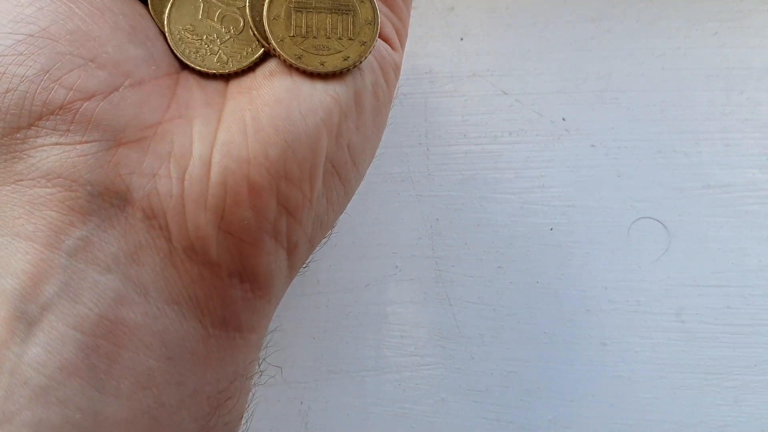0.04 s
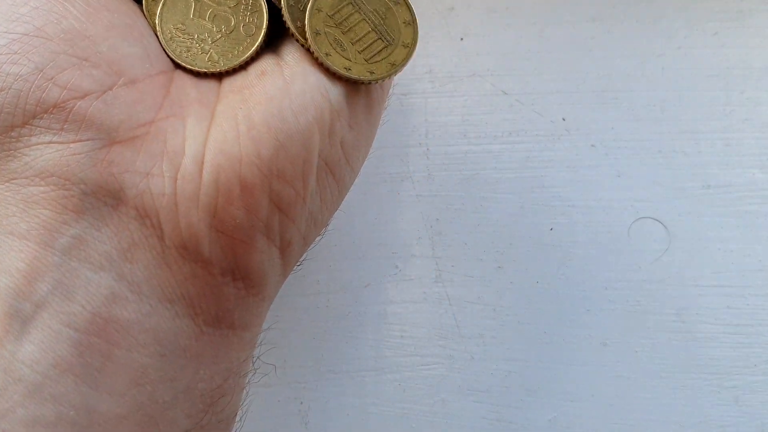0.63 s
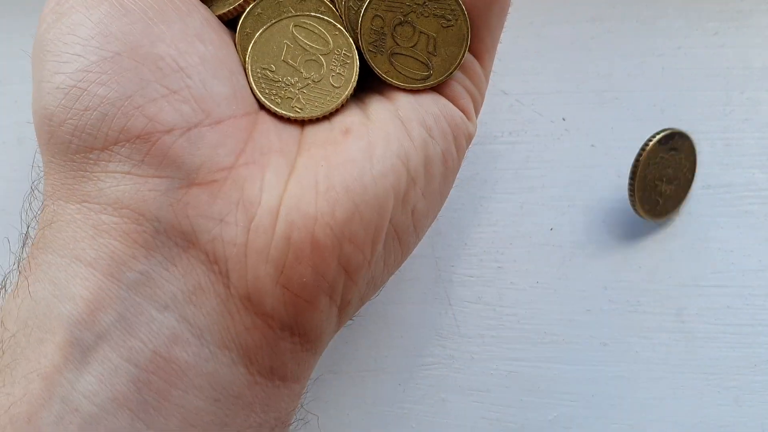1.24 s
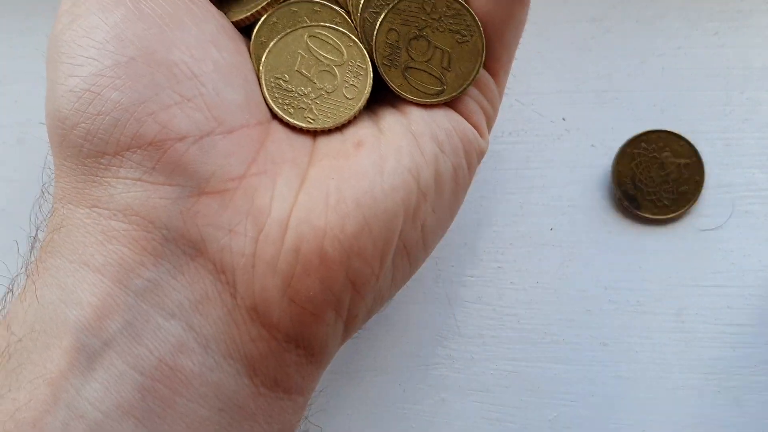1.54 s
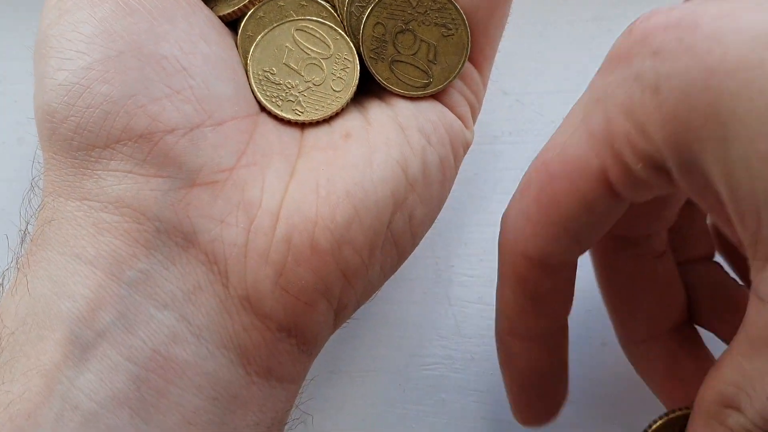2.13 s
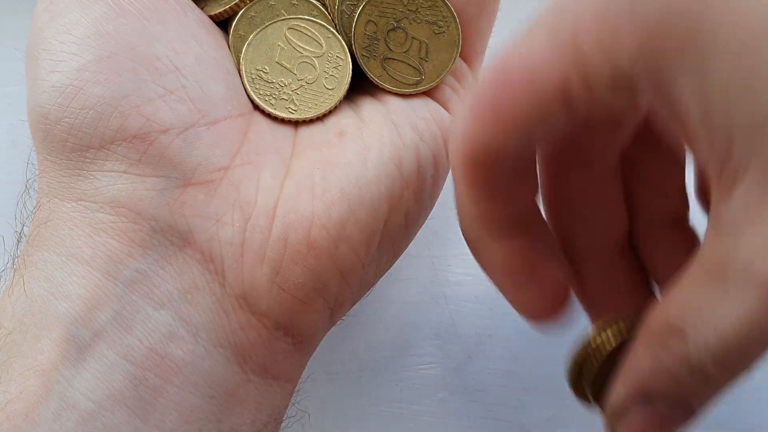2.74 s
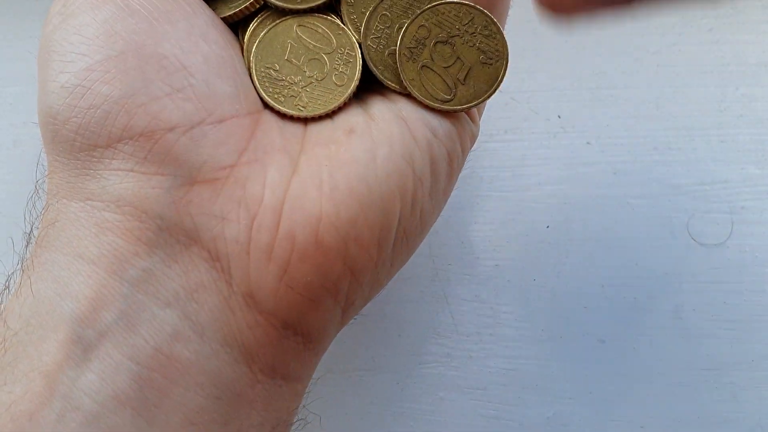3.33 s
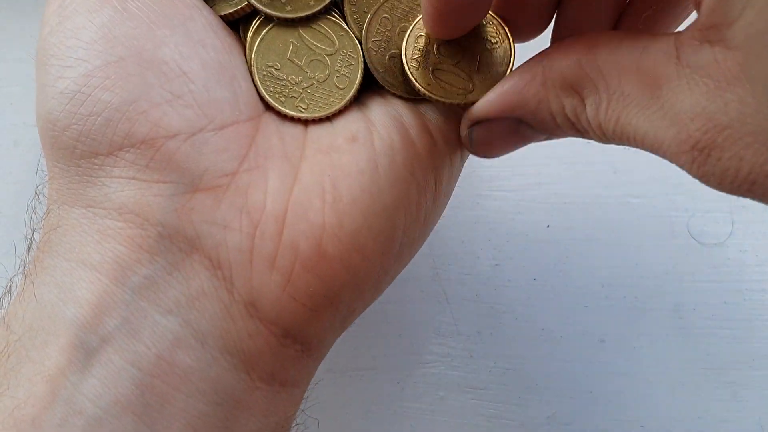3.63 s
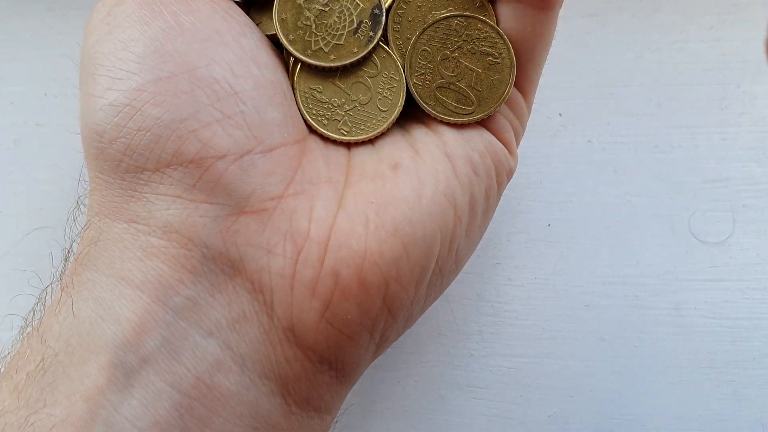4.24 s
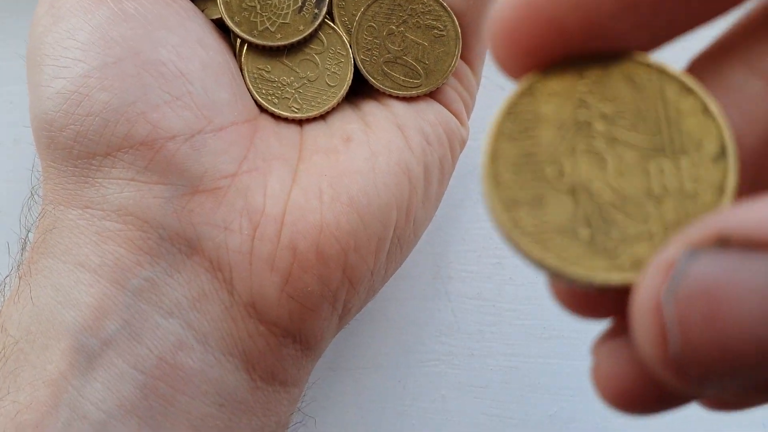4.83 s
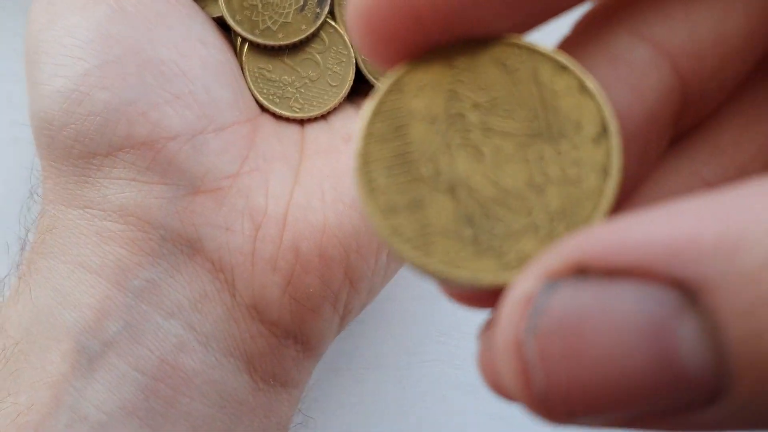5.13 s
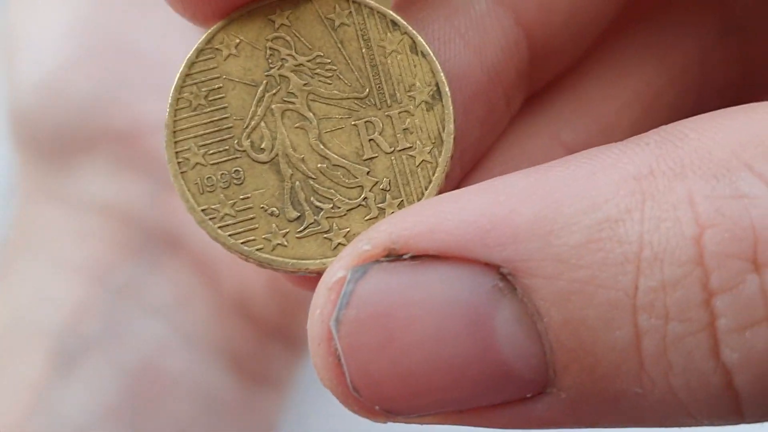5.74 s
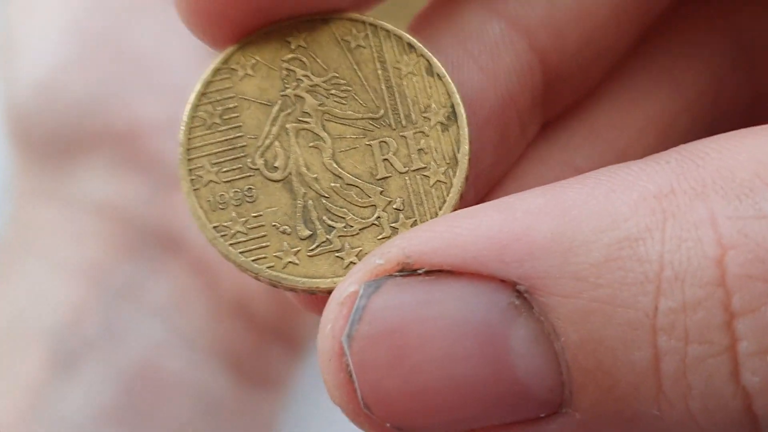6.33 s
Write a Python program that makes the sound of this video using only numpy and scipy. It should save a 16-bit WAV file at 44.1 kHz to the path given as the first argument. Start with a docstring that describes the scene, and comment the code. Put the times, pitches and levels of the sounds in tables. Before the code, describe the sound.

Coins shift in a palm, two fall and bounce on wood, one wobbles until stopped, then the pile clinks again.

```python
"""A small quiet room, the microphone close to a palm in which a handful of coins slides and clinks.
At about 0.9 s two coins slip off and bounce on a painted wooden board: the wood knocks, the metal sings.
They roll over the grain in a quickening wobble until fingers stop them (2.3 s) and slide them off.
The pile clinks again as a coin is picked out (3.2 s). Faint scuffs and a few light bumps
further off follow, over the hum of the room and the hiss of the microphone."""
import sys
import numpy as np
from scipy import signal
from scipy.fft import rfft, irfft
from scipy.io import wavfile
from scipy.ndimage import uniform_filter1d, minimum_filter1d

SR = 44100
rng = np.random.default_rng(int(sys.argv[2]) if len(sys.argv) > 2 else 0)


def dump_mix(stems):
    """Bounce the given channels to the path in sys.argv[1] as a 16-bit WAV at rate SR."""
    frames = np.atleast_2d(stems).T  # one column per channel
    limited = np.clip(frames, -1, 1)  # hard clip at full scale
    pcm = np.round(limited * 32767).astype(np.int16)
    wavfile.write(sys.argv[1], SR, pcm)


N = 291096
T = np.arange(12288) / SR  # time axis of one short sound
HZ = np.fft.rfftfreq(len(T), 1 / SR)  # its frequency axis

# the high note a free coin sings: f/Hz, level/dB relative to the knock, t60/s
FIRST = dict(hz=12484, db=-38, t60=.45)  # the first coin to fall
SECOND = dict(hz=13561, db=-30.5, t60=.52)  # the second coin, struck on its rim
SECOND_FLAT = dict(hz=13264, db=-24, t60=.5)  # the twin note of that coin
CAUGHT = dict(hz=12500, db=7, t60=.1)  # a coin stopped by the fingers
LOOSE = dict(hz=13290, db=1, t60=.14)  # a coin lying free on top of the pile
BOARD_BLOWS = [(0.9258, -10, 2880, None, FIRST), (1.0025, -10, 2840, None, FIRST),
               (1.0256, -15.5, 7000, 0.0092, SECOND), (1.1072, -13.5, 4140, None, SECOND),
               (1.1502, -15.5, 3670, None, None), (1.163, -11, 4370, None, SECOND_FLAT),
               (1.175, -14.5, 5600, None, SECOND), (1.1914, -20, 4060, None, None),
               (1.2255, -20.5, 5700, None, None), (1.2387, -22, 6000, .0094, SECOND),
               (1.2582, -15.5, 2670, None, FIRST), (1.3071, -20.5, 3200, None, FIRST),
               (1.3346, -17.5, 7500, 0.0078, SECOND), (1.366, -29, 6080, None, None),
               (1.387, -27, 4670, None, None), (1.414, -31, 5000, None, None),
               (1.8277, -24.5, 5630, 0.0031, None), (2.2673, -21.5, 10000, .0062, None),
               (2.292, -28.5, 8360, 0.01, None), (2.402, -33, 7500, 0.008, None),
               (2.508, -48, 5910, None, None), (2.6125, -44.5, 12000, None, None),
               (2.7224, -34, 2920, None, None)]
COIN_KNOCKS = [(0.009, -46.5, 9700, LOOSE), (0.0421, -41.5, 5750, None), (0.0784, -35.5, 7000, LOOSE),
               (.098, -42.5, 5930, None), (0.1174, -44, 7450, None), (.159, -41.5, 5460, None),
               (0.2954, -38.5, 1810, None), (0.341, -45, 1660, None), (0.52, -47.5, 1140, None),
               (.527, -45.5, 1170, None), (0.6238, -50, 2550, None), (0.6687, -46.5, 3500, None),
               (0.69, -43, 1220, None), (0.7027, -43.5, 6900, None), (0.7489, -44, 2880, None),
               (0.7916, -48, 4500, None), (0.848, -45.5, 6010, None), (.886, -51, 1390, None),
               (2.2594, -35, 18000, CAUGHT), (2.266, -51, 14000, None), (2.2873, -46, 12000, None),
               (2.409, -61, 14000, None), (2.661, -57, 9000, None), (2.691, -51.5, 9900, None),
               (2.7213, -44.5, 14000, None), (3.1596, -30.5, 15130, LOOSE), (3.1736, -28.5, 17000, LOOSE),
               (3.205, -30.5, 15160, LOOSE), (3.2612, -48, 12000, None), (3.557, -51.5, 12000, None),
               (3.5819, -50, 12350, None), (3.6513, -61, 7960, None), (3.684, -60, 11900, None),
               (3.7539, -50, 7000, None), (3.7704, -50, 5970, None), (3.783, -49, 5460, None)]


def amp(db):
    """Decibels to gain."""
    return 10 ** (np.asarray(db) / 20)


def unit(x):
    """Scales to rms 1."""
    return x / np.sqrt(np.mean(x ** 2) + 1e-20)


def unit_attack(x):
    """Scales a blow so that its first 4 ms have rms 1."""
    return x / np.sqrt(np.mean(x[:176] ** 2) + 1e-20)


def at_hz(points, hz):
    """Reads a table on a log-frequency axis."""
    f, value = np.transpose(points)
    return np.interp(np.log(hz + 1), np.log(f + 1), value)


def add(mix, s, sound):
    """Adds a sound to the mix at s seconds."""
    part = mix[max(round(s * SR), 0):][:len(sound)]
    part += sound[:len(part)]


def shortest_pulse(db):
    """The minimum-phase pulse that has this spectrum."""
    log_gain = np.log(amp(np.maximum(db, db.max() - 100)))
    mirrored = np.concatenate([log_gain, log_gain[-2:0:-1]])
    return np.fft.ifft(np.exp(np.conj(signal.hilbert(mirrored)))).real


def through(x, pulse):
    """Convolves, keeping the length."""
    return signal.oaconvolve(x, pulse)[:len(x)]


def excite(drive, pulse):
    """Drives a body whose pulse response is scaled to energy 1."""
    return through(drive, pulse / np.linalg.norm(pulse))


def ring(modes, t60):
    """Modes (f/Hz, level/dB) that start together and die at one rate."""
    return sum(amp(db - 60 * T / t60) * np.sin(2 * np.pi * hz * T) for hz, db in modes)


def lowpass(x, corner_hz):
    """Takes off the treble, as a longer, softer contact does."""
    return signal.lfilter(*signal.butter(2, np.clip(corner_hz, 10, .47 * SR), fs=SR), x)


def scatter(db, fade_s):
    """A click followed by dense, dying reflections within a body."""
    out = amp(db) * rng.standard_normal(len(T)) * np.exp(-T / fade_s) * (1 - np.exp(-T / .00029))
    out[0] = 1
    return out


def gestures(rows):
    """Gain of movements that each build up to a peak and die away."""
    t = np.arange(N) / SR
    swells = (amp(db) * np.exp(-np.maximum((s - t) / rise, (t - s) / fall)) for s, db, rise, fall in rows)
    return np.sqrt(sum(swell ** 2 for swell in swells))


def background(floor_db=-62.5, rumble_hz=(30, 132)):
    """Room hum and microphone hiss, with a low rumble when the hands move."""
    # spectrum of the hum and hiss: f/Hz, relative level/dB
    floor_spectrum = [(15, -28), (25, 1), (149, -7.5), (293, -23), (326, -18), (516, -30.5), (560, -29.5),
                      (677, -30.5), (1560, -35.5), (1840, -38.5), (3160, -45), (5880, -35.5),
                      (16000, -42.5)]
    # hand movements: peak t/s, level/dB, rise/s, fall/s
    hand_moves = [(1.67, -50, 0.04, 0.18), (2.4, -57.5, 0.3, 0.043), (3.74, -59, .04, .06)]
    colour = amp(at_hz(floor_spectrum, np.fft.rfftfreq(N, 1 / SR)))
    room_tone = unit(irfft(rfft(rng.standard_normal(N)) * colour, N))
    band = signal.butter(2, rumble_hz, "band", fs=SR, output="sos")
    rumble = unit(signal.sosfilt(band, rng.standard_normal(N)))
    return amp(floor_db) * room_tone + gestures(hand_moves) * rumble


def pile_pulse(modes_db=-19):
    """A coin held among others: a sharp click and short modes that shift with the grip."""
    # the bare click of coin on coin: f/Hz, relative level/dB
    click_spectrum = [(150, -29.5), (500, -23.5), (900, -14), (1600, 1.5), (3000, -1), (4500, -1.5),
                      (7500, -4), (9200, 1.5), (11500, -7), (13300, 8.5), (16000, -6.5)]
    # the damped pile: f/Hz, relative level/dB, t60/s, largest share by which the grip shifts f
    pile_modes = [(1500, -22, .018, 0.6), (2560, -17, 0.033, .09), (4000, -22, 0.033, 0.13),
                  (5320, -17.5, 0.034, 0.1), (7000, -18.5, .015, 0.048), (9200, -14.5, .025, .05),
                  (12400, -13.5, .03, .012), (13250, -13.5, .045, .008), (13530, -16, .04, 0.0085)]
    click = shortest_pulse(at_hz(click_spectrum, HZ))
    hz, db, t60, max_shift = np.transpose(pile_modes)[:, :, None]
    gripped_hz = hz * (1 + max_shift * rng.uniform(-1, 1, hz.shape))
    modes = amp(db - 60 * T / t60) * np.sin(2 * np.pi * gripped_hz * T)
    return click / abs(click).max() + amp(modes_db) * modes.sum(0)


def shuffling(slips_per_s=3500, spread_db=1.5, corner_hz=7500, places=3):
    """Embossed faces catch and slip in many tiny clicks, at several places in the pile."""
    # coins sliding over each other: peak t/s, level/dB, rise/s, fall/s
    slides = [(.005, -47, 0.022, 0.016), (.087, -45, 0.046, 0.04), (.72, -61, 0.12, 0.15),
              (.85, -54, .05, 0.032), (3.18, -53, 0.012, 0.023), (3.212, -41, 0.0025, 0.0079),
              (3.58, -59.5, 0.0098, 0.022), (3.779, -44, 0.0068, 0.0072)]
    size = amp(spread_db * np.minimum(rng.exponential(1, N), 4)) * np.sign(rng.standard_normal(N))
    slips = unit(size * (rng.random(N) < slips_per_s / SR)) * gestures(slides)
    place = rng.integers(0, places, N)
    return sum(excite(slips * (place == k), lowpass(pile_pulse(), corner_hz)) for k in range(places))


def clinks(free_fade_s=.0084, cushioned_fade_s=.0019, cushion_hz=4000, thud_hz=520, thud_db=-17):
    """Each knock sets the neighbouring coins chattering; a cushioned one also thuds in the palm."""
    out = np.zeros(N)
    for s, db, corner_hz, _ in COIN_KNOCKS:
        cushioned = 1 / (1 + (corner_hz / cushion_hz) ** 2)
        fade_s = free_fade_s + cushioned * (cushioned_fade_s - free_fade_s)  # skin stills the chatter
        spectrum = rfft(scatter(db=-5, fade_s=fade_s))
        # the many small contacts share out their energy fairly evenly over the modes
        chatter = irfft(spectrum / np.sqrt(abs(spectrum) + 1e-9)) * (T < .02)
        thud = signal.lfilter(*signal.iirpeak(thud_hz, 1, SR), lowpass(chatter, 2 * thud_hz))
        metal = lowpass(through(chatter, pile_pulse()), corner_hz)
        add(out, s, amp(db) * (unit_attack(metal) + cushioned * amp(thud_db) * unit_attack(thud)))
    return out


def ringing(flutter_hz=22, flutter_depth=.35, spin_hz=9, edge_on=.26, rise_s=.005):
    """A knocked coin that is free to ring sings one high note, which flutters as its faces tumble."""
    out, t = np.zeros(N), np.arange(SR // 2) / SR
    for s, knock_db, *_, note in BOARD_BLOWS + COIN_KNOCKS:
        if note is not None:
            flutter = 1 + flutter_depth * unit(lowpass(rng.standard_normal(len(t)), flutter_hz))
            facing = edge_on + abs(np.cos(2 * np.pi * spin_hz * t))  # loud face on, faint edge on
            envelope = amp(knock_db + note["db"] - 60 * t / note["t60"]) * (1 - np.exp(-t / rise_s))
            tone = np.sin(2 * np.pi * (note["hz"] * t + rng.random()))
            add(out, s, envelope * flutter * facing * tone)
    return out


def strokes(rows, rise_share=.25):
    """Brief bands of friction noise; the slower ones also start more softly."""
    out = np.zeros(N)
    for s, db, fade, hz, octaves in rows:
        band = 1 / (1 + (np.log2((HZ + 1) / hz) / octaves) ** 4)
        friction = unit(irfft(rfft(rng.standard_normal(len(T))) * band))
        envelope = (1 - np.exp(-T / (rise_share * fade))) * np.exp(-T / fade)
        add(out, s, amp(db) * envelope / envelope.max() * friction)
    return out


def handling(ring_db=-14, hum_s=4.765, hum_hz=306, hum_db=-56, hum_t60=.86):
    """Soft rubs close by, then bumps further off that ring a little; the firmest leaves a low note."""
    # skin rubbing on metal: t/s, level/dB, fade/s, centre f/Hz, half width/octaves
    rubs = [(.065, -43, 0.013, 520, 2.5), (.155, -51, 0.0083, 500, 1.4), (.212, -63, 0.046, 650, 1.1),
            (.247, -57, 0.019, 1670, .9), (.43, -62.5, .07, 1300, 1.4), (.67, -58.5, 0.033, 520, 1.5),
            (.77, -61, 0.037, 520, 2), (.875, -54.5, .012, 700, 1.2), (2.918, -61, 0.015, 330, 0.57),
            (3.692, -59, .022, 3596, .3), (3.696, -63, 0.026, 984, 0.42), (3.774, -46, 0.0055, 2074, 0.47),
            (3.772, -55.5, 0.007, 650, 0.85)]
    # light bumps of something being handled: columns as for the rubs
    light_bumps = [(4.64, -70.5, .028, 3700, 0.29), (4.677, -61, .013, 787, 1.3),
                   (4.751, -51.5, 0.0073, 3580, 0.92), (4.759, -42.5, 0.0044, 3480, 0.4),
                   (4.758, -54.5, 0.0099, 886, 1.8), (4.943, -62.5, 0.022, 1700, 1.4),
                   (5.044, -64, 0.037, 2190, 1.2), (5.455, -72.5, .04, 1860, 0.47)]
    # modes of the bumped thing: f/Hz, relative level/dB
    bump_modes = [(1222, -80), (1685, -89), (1906, -84), (2239, -89), (3273, -98), (3445, -95), (3618, -90),
                  (4081, -85), (4183, -87), (4350, -88)]
    bumps = strokes(light_bumps)
    out = strokes(rubs) + bumps + amp(ring_db) * excite(bumps, ring(bump_modes, t60=.066))
    t = np.arange(SR) / SR
    add(out, hum_s, amp(hum_db - 60 * t / hum_t60) * np.sin(2 * np.pi * hum_hz * t))
    return out


def board_pulse(modes_db=-33, lag_s=.00042, lowest_hz=135):
    """The wood's answer to one tap: a knock carried by bending waves, and ringing modes."""
    # the wood's knock under a hard tap: f/Hz, relative level/dB
    knock_spectrum = [(100, -24.5), (175, -11.5), (250, -2.5), (335, -7.5), (520, -12), (720, -9),
                      (950, -6.5), (1700, 4), (2600, 2.5), (3600, -1.5), (4800, -5.5), (7000, -11.5),
                      (10000, -22.5), (12000, -25), (14500, -16.5), (16000, -15)]
    # the board's modes: f/Hz, relative level/dB (its spread is halved below)
    board_modes = [(183.0, -59.5), (328.4, -44.5), (398.4, -62), (570.6, -59), (716.0, -39), (839.8, -49.5),
                   (963.6, -54), (1233, -50), (1287, -55.5), (1378, -54), (1497, -50), (1631, -48),
                   (1814, -35), (1976, -41), (2164, -57.5), (2492, -43.5), (2579, -45.5), (3031, -45),
                   (3203, -45), (3435, -58)]
    # how long the wood rings: f/Hz, t60/s
    board_decay = [(200, .15), (700, .09), (3000, .05)]
    delay = lag_s * np.sqrt(2000 / (HZ + 1))  # bending waves are slower in the bass
    tap = shortest_pulse(at_hz(knock_spectrum, HZ))
    knock = irfft(rfft(tap) * np.exp(-2j * np.pi * HZ * delay)) * (T < .1)
    hz, db = np.transpose(board_modes)[:, :, None]
    strength_db = .5 * (db - db.max()) - 60 * T / at_hz(board_decay, hz)
    modes = (amp(strength_db) * np.cos(2 * np.pi * hz * T)).sum(0) * (1 - np.exp(-T / .0021))
    wood = knock / np.linalg.norm(knock) + amp(modes_db) * modes
    return signal.sosfilt(signal.butter(4, lowest_hz, "high", fs=SR, output="sos"), wood)


def rebounds(gap, count=3, shrink=.8, loss_db=3.5):
    """A blow and any rebounds, each weaker and sooner than the last: delay/s, loss/dB."""
    if gap is None:
        return [(.00018, .0017)]
    return [(gap * sum(shrink ** j for j in range(k)), loss_db * k) for k in range(count)]


def bounces(wood):
    """Each blow lands on another spot, so its waves return from the board's edges differently."""
    out = np.zeros(N)
    for s, db, corner_hz, gap, _ in BOARD_BLOWS:
        for delay, loss_db in rebounds(gap):
            waves = through(scatter(db=-23, fade_s=.0089), wood)
            add(out, s + delay, amp(db - loss_db) * unit_attack(lowpass(waves, corner_hz)))
    return out


def grain(ticks_per_s=420, spread_db=4, grit=.8, ridge_db=1.26, ridge_hz=70):
    """A rim ticking over the grain of the wood and the ridges in the paint."""
    tick_rate = ticks_per_s * np.exp(.5 * unit(uniform_filter1d(rng.standard_normal(N), 90)))
    strength = amp(spread_db * rng.uniform(-1, 1, N))
    ticks = np.diff(np.floor(np.cumsum(tick_rate) / SR), prepend=0) * strength
    ridges = amp(ridge_db * unit(lowpass(rng.standard_normal(N), ridge_hz)))
    return unit(ridges * (unit(ticks - ticks.mean()) + grit * rng.standard_normal(N)))


def rolling(wood, light_hz=3200, firm_hz=4200, rasp_hz=2600, rasp=.8, sing_db=-32):
    """The rolling rim is harder and brighter once in every wobble, and keeps the coins singing."""
    # force of the rim between wobbles: t/s, level/dB
    rim_force = [(.98, -76), (1.03, -71), (1.25, -36.5), (1.38, -43), (1.5, -39), (1.58, -41.5),
                 (1.67, -37), (1.8, -40), (1.9, -46.5), (2.05, -45), (2.25, -46), (2.36, -52.5),
                 (2.5, -100)]
    # notes of the two coins: f/Hz, relative level/dB
    coin_notes = [(12484, -2.5), (13264, -4.5), (13561, -2.5)]
    force = amp(np.interp(np.arange(N) / SR, *np.transpose(rim_force))) * wobble()
    drive = grain() * force
    light, firm = lowpass(wood, light_hz), lowpass(wood, firm_hz)
    firm = firm + rasp * signal.lfilter(*signal.iirpeak(rasp_hz, 2, SR), firm)  # a pressed rim rasps
    firmness = force / force.max()
    body = (1 - firmness) * excite(drive, light) + firmness * excite(drive, firm)
    return body + amp(sing_db) * excite(drive, ring(coin_notes, t60=.26))


def wobble(turns=14, from_s=1.427, turn_s=.0795, step_s=.0027, swell_db=9.5, width_s=.0105):
    """The rim bears down once in every turn, and the turns quicken as the coin leans over."""
    t, k = np.arange(N) / SR, np.arange(turns)
    peaks = from_s + turn_s * k - step_s * k * (k - 1) / 2
    swells = sum(np.exp(-.5 * ((t - s) / width_s) ** 2) for s in peaks)
    return np.sqrt(1 + amp(swell_db) ** 2 * swells)


def pressed(x, weight, body_hz=(600, 1500)):
    """Adds the woody body that comes with the weight of the fingers."""
    return x + weight * signal.lfilter(*signal.butter(2, body_hz, "band", fs=SR), x)


def damped(x, touching, below_hz=330):
    """A hand resting on the board takes away part of its bass."""
    return x - touching * signal.lfilter(*signal.butter(1, below_hz, fs=SR), x)


def dragging(corner_hz=2800, weight_db=4):
    """A coin pressed flat scrapes over the grain with a dull, woody sound."""
    # fingers drawing a coin over the board: peak t/s, level/dB, rise/s, fall/s
    drags = [(2.305, -42, 0.014, 0.0089), (2.364, -50, 0.009, .008), (2.412, -38.5, 0.014, 0.0097),
             (2.61, -57, 0.033, 0.021), (2.70, -42.5, 0.019, 0.028), (2.728, -44, 0.005, 0.0048)]
    dull_wood = lowpass(board_pulse(modes_db=-39.5), corner_hz)
    return excite(grain() * gestures(drags), pressed(dull_wood, amp(weight_db)))


def scuffs(rise_s=.025, fall_s=.05, band_hz=(420, 740)):
    """Short swells of dull noise in the background, all of one shape."""
    # faint scuffs: peak t/s, level/dB
    scuff_peaks = [(3.44, -72.5), (4.08, -71), (4.39, -69.5), (5.02, -66.5), (5.35, -73.5), (5.57, -76.5),
                   (6.02, -78.5), (6.32, -72.5)]
    envelope = gestures([(s, db, rise_s, fall_s) for s, db in scuff_peaks])
    band = signal.butter(3, band_hz, "band", fs=SR, output="sos")
    return envelope * unit(signal.sosfilt(band, rng.standard_normal(N)))


def room(x, build_s=.0089):
    """The walls of a small room return dense echoes, each band dying at its own speed."""
    # reverberation time: f/Hz, t60/s
    room_decay = [(150, 0.39), (400, 0.33), (1500, 0.21), (4000, 0.26), (8000, .2), (15000, 0.11)]
    hz, t, bands = signal.stft(rng.standard_normal(SR // 2), SR, nperseg=256)
    decay = amp(-60 * t / at_hz(room_decay, hz)[:, None])
    tail = signal.istft(bands * decay, SR, nperseg=256)[1]
    tail *= 1 - np.exp(-(np.arange(len(tail)) / SR / build_s) ** 2)
    return excite(x, tail)


def scene(touch_s=1.85, touch_db=-1):
    """Palm, board and handling at one close microphone; fingers rest on the board from touch_s on."""
    wood = board_pulse()
    touching = np.arange(N) / SR > touch_s
    board = bounces(wood) + rolling(wood) + dragging()
    board = damped(pressed(board, amp(touch_db) * touching), touching)
    palm = clinks() + shuffling()
    fingers = handling()
    echoes = room(amp(-15.5) * board + amp(-12) * palm + amp(-4) * fingers)
    return (board + palm + fingers + ringing() + scuffs() + echoes + background())[None]


def record(dry, edge_hz=16150):
    """A quick limiter holds the peaks at full scale; then the treble is cut above edge_hz."""
    needed_gain = 1 / np.maximum(abs(dry), 1)
    smooth_gain = uniform_filter1d(minimum_filter1d(needed_gain, size=89), size=89)  # 2 ms windows
    band_limit = signal.firwin(301, edge_hz, window=("kaiser", 9), fs=SR)
    return signal.oaconvolve(dry * smooth_gain, band_limit[None], "same")


dry = scene()
out = record(dry)
dump_mix(out)
```